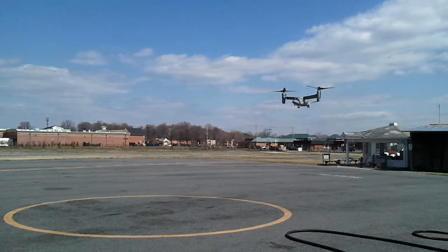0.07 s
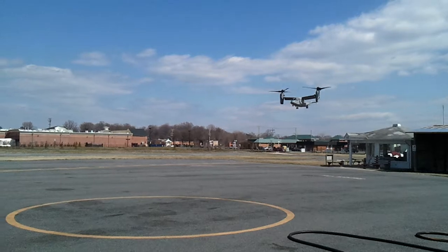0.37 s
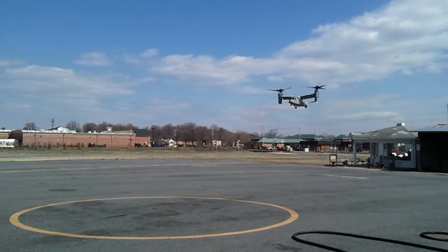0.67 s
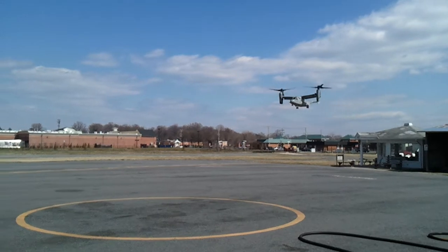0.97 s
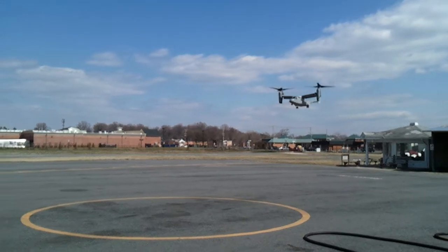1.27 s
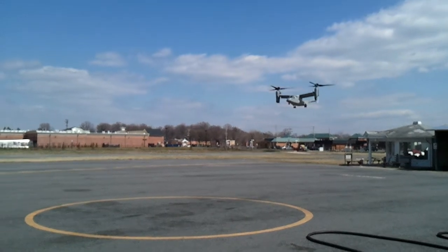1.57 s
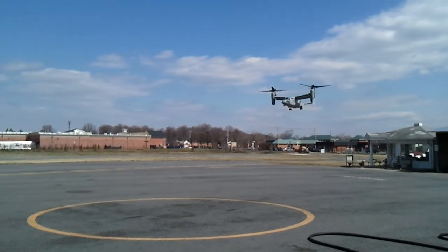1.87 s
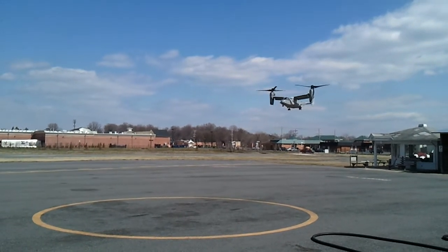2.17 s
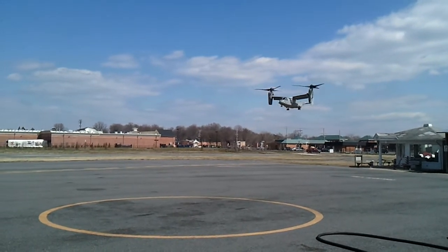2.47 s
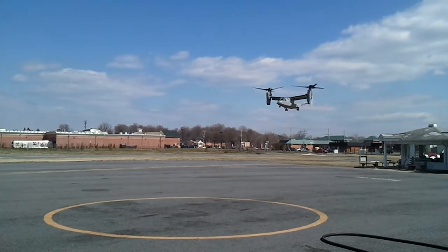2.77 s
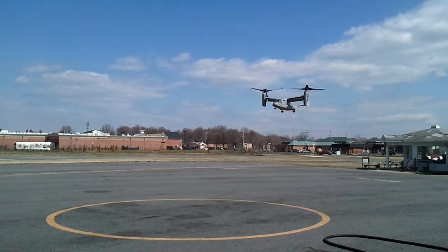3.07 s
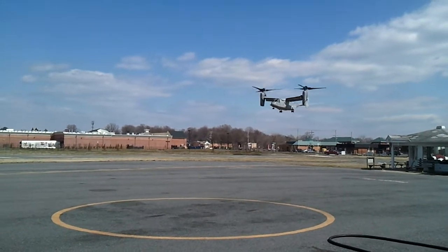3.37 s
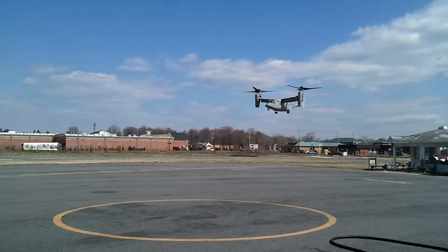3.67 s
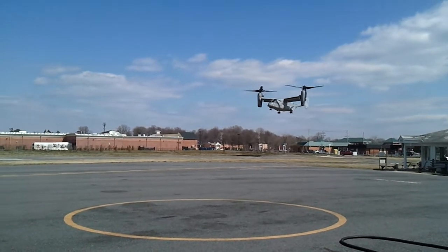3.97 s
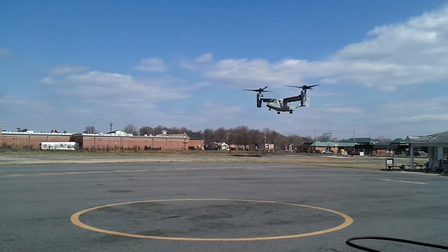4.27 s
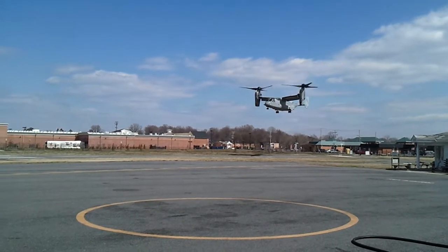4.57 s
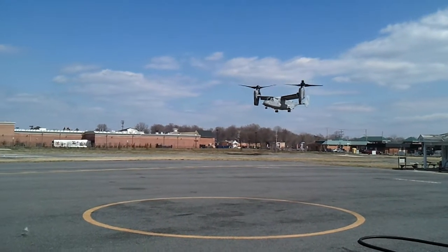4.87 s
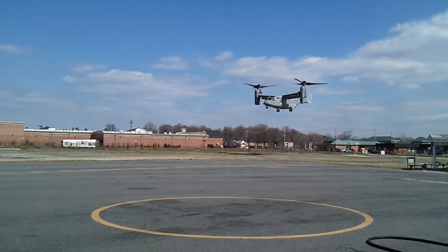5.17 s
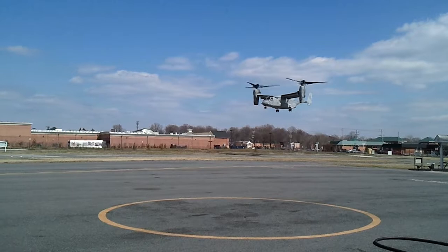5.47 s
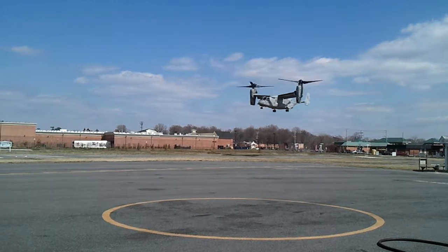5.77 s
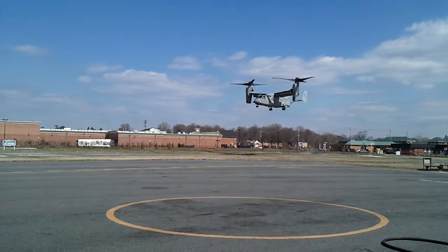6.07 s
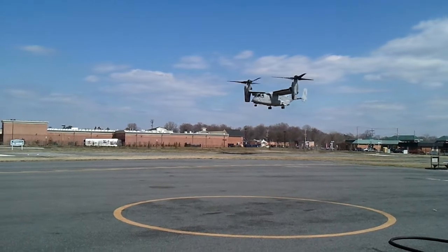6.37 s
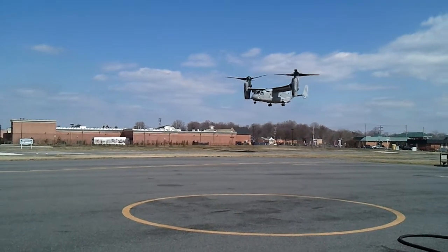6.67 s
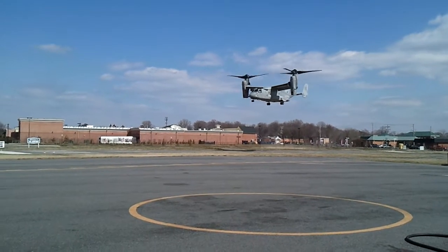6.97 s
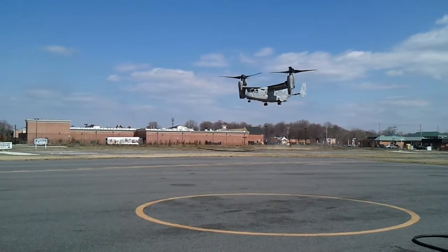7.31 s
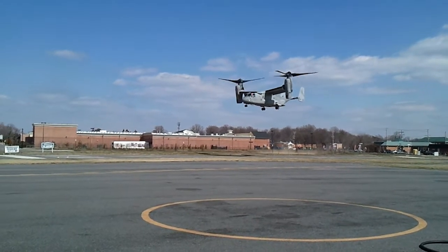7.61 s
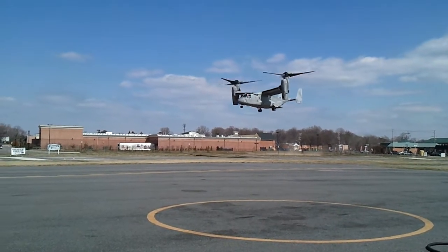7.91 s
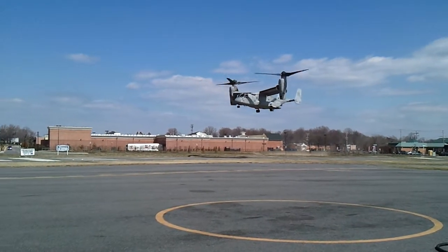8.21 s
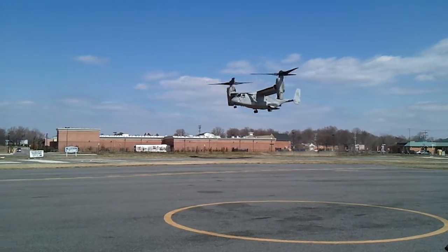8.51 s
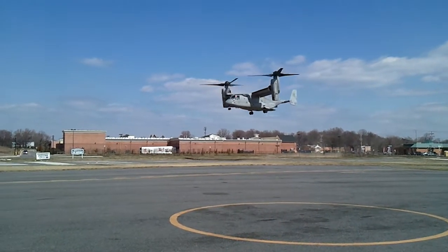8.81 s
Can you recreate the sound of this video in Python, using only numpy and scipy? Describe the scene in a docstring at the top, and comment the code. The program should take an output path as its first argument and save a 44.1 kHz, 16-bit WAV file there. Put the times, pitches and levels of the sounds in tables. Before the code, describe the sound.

Loud, rapid, rasping rotor thumps from a nearing tiltrotor overload the microphone, joined by a swelling engine roar and whine.

```python
"""Fast, rasping thumps fade up after a short silence: a tiltrotor comes in low over an airfield.
Its two three-bladed rotors turn in step. The blades thump, slap through vortices (whirls of air
shed by the blade tips) and churn their wake. As the aircraft turns side-on, the rotors' thumps
slide past each other and the turbines' roar and whine grow. The pressure completely overloads
the small microphone, so the thumps choke the roar into rasping bursts."""
import sys
import numpy as np
from scipy import signal
from scipy.fft import rfft, irfft, next_fast_len
from scipy.io import wavfile
from scipy.ndimage import uniform_filter1d, minimum_filter1d

SR = 44100
rng = np.random.default_rng(int(sys.argv[2]) if len(sys.argv) > 2 else 0)


def materialize(psi):
    """Save the field psi as 16-bit PCM at rate SR to the path in sys.argv[1].

    A 1-D psi becomes a single channel; in a 2-D psi each row is a channel.
    """
    bounded = np.clip(np.atleast_2d(psi).T, -1, 1)
    quanta = np.round(bounded * 32767).astype(np.int16)
    wavfile.write(sys.argv[1], SR, quanta)


N = 390285
TIME = np.arange(N) / SR


def from_db(db):
    """Turn decibels into a number to multiply by."""
    return 10 ** (np.asarray(db) / 20)


def unit_power(x):
    """Scale a signal so that its average power is 1."""
    return x / np.sqrt(np.mean(x ** 2) + 1e-20)


def in_time(rows):
    """Join a table's rows with straight lines: one curve for each column after the time."""
    seconds, *columns = np.transpose(rows)
    return [np.interp(TIME, seconds, column) for column in columns]


def bell(offset, width):
    """A smooth hump, 1 high where the offset is zero."""
    return np.exp(-(offset / width) ** 2)


def drift(rate_hz):
    """A smooth random wobble, typically about 1 in size."""
    step, warm_up = 40, 2000
    pole = np.exp(-2 * np.pi * rate_hz * step / SR)
    noise = rng.standard_normal(N // step + warm_up + 2)
    slow = signal.lfilter([1], [1, -2 * pole, pole * pole], noise)[warm_up:]
    return np.interp(np.arange(N) / step, np.arange(len(slow)), unit_power(slow))


def coloured(noise, spectrum):
    """Shape noise with a spectrum, which says how strong its pitches are next to each other."""
    size = next_fast_len(N)
    hz, db = np.transpose(spectrum)
    bin_hz = np.maximum(np.fft.rfftfreq(size, 1 / SR), 1)
    gain = from_db(np.interp(np.log(bin_hz), np.log(hz), db))
    return unit_power(irfft(rfft(noise, size) * gain, size)[:N])


def shaped_noise(spectrum):
    """Fresh, steady noise with the given spectrum."""
    return coloured(rng.standard_normal(N), spectrum)


def since(cycles):
    """Time from the nearest blade pass, negative before it. One cycle runs from blade to blade."""
    return (cycles + .5) % 1 - .5


def eddies(cycles, spectrum, memory, points=2048):
    """Each blade meets nearly the same swirls of air as the last, so this noise partly repeats."""
    fresh = rng.standard_normal((int(cycles[-1]) + 2, points))
    swirls = signal.lfilter([1], [1, -memory], fresh, axis=0).ravel()
    return coloured(np.interp(cycles * points, np.arange(swirls.size), swirls), spectrum)


# The turn. Each row: time in seconds, angle from the aircraft's nose to the microphone in degrees.
HEADING = [(.8, 16.4), (3.3, 21), (4.4, 30.8), (5.3, 32.6), (6.1, 43.3), (7, 55.8), (7.7, 63.1),
           (8.85, 64.3)]
def flight(blade_hz=21.421, sag_hz_per_s=.0413):
    """Give the heading and count blade passes; the Doppler shift ebbs as the craft slows and turns."""
    heading, = in_time(HEADING)
    return heading, np.cumsum(blade_hz - sag_hz_per_s * TIME) / SR


def thump(cycles, width):
    """A blade pushes on the air: suction, then pressure."""
    phase = since(cycles) / width
    return phase * np.exp((1 - phase ** 2) / 2)


def slaps(cycles, lead=.0281, spacing=.175, width=.0202):
    """A blade cuts two vortices in turn; each gives a suction spike between two humps of pressure."""
    out = 0
    for delay, db in ((0, .5), (spacing, -4.5)):
        phase = since(cycles + lead - delay) / width
        out += from_db(db) * (phase ** 2 - 1) * np.exp(-phase ** 2 / 2)
    return out


# How the thumps change in the turn. Each row: time in seconds, near rotor gain in dB,
# far rotor gain in dB, delay of the far thump in cycles, hum level in dB.
THUMP_CHANGES = [(.8, 0, 0, .41, -20), (2.2, 0, 0, .41, -19), (3.2, 0, 0, .405, -16.5),
                 (3.8, 0, .5, .412, -16.5), (5.1, 0, .5, .416, -16), (5.8, -1, 2, .39, -18.5),
                 (6.4, -1, .5, .394, -18.5), (7, 0, -1, .41, -16.5), (7.6, -.5, -1, .41, -14.5),
                 (8.85, -1, -.5, .41, -16)]
def rotors(cycles, heading, meet_deg=44, slide_cycles_per_deg=.01, hum_harmonic=5):
    """Both rotors thump over a steady hum. Gives the sound and each rotor's count of blade passes."""
    near_db, far_db, far_delay, hum_db = in_time(THUMP_CHANGES)
    far = cycles - far_delay
    # turning shifts the paths from the two rotors, so their thumps meet and part again
    near = far + slide_cycles_per_deg * (meet_deg - heading)
    near_rotor = from_db(near_db) * thump(near + .001 * drift(9), width=.0586)
    far_rotor = from_db(far_db) * (from_db(-4.5) * thump(far, width=.0504) + slaps(far))
    hum = from_db(hum_db) * np.sin(2 * np.pi * hum_harmonic * far)
    return (near_rotor + far_rotor + hum) * from_db(1.3 * drift(2.16)), near, far


# The noise of a cut vortex. Each row: pitch in Hz, level in dB.
VORTEX_SPECTRUM = [(250, 0), (480, -2), (615, 9.5), (780, 3.5), (950, -4), (1250, 1), (1500, -4),
                   (2000, -27), (3500, -48.5), (7000, -49)]
# The hardest slaps. Each row: start in seconds, relative level in dB, pitch in Hz.
BARK_HITS = [(1.005, -5, 660), (1.976, 0.5, 697), (2.269, -5, 587), (2.316, -2.5, 705), (2.374, -2, 633),
             (2.878, 1, 645), (3.164, -5, 1212), (3.368, -3.5, 611), (3.825, -10, 624), (4.005, 0.5, 630),
             (4.098, -5.5, 785), (4.43, -1, 808), (4.572, -2, 620), (4.622, -4, 635), (4.655, -1.5, 610),
             (4.813, 3, 626), (5.761, 4, 634), (5.895, -1, 630), (5.989, 0.5, 1260), (6.13, -1, 650),
             (6.325, 0, 641), (8.124, 3, 607), (8.514, 1, 606)]
def barks(gain_db=-1.5, rise_s=.0024, ring_share=.64, swell_db=6, swell_lead_s=.0042):
    """A blade cuts a vortex squarely: a swell of pressure, then a bark, part ring and part noise."""
    out, noise = np.zeros(N), shaped_noise(VORTEX_SPECTRUM)
    for start, db, hz in BARK_HITS:
        span = slice(int((start - 4 * swell_lead_s) * SR), int((start + 10 * rise_s) * SR))
        age = np.maximum(TIME[span] - start, 0)
        ring = np.sqrt(2) * np.sin(2 * np.pi * hz * age)
        burst = from_db(db + gain_db) * age / rise_s * np.exp(1 - age / rise_s)
        out[span] += from_db(swell_db) * bell(TIME[span] - start + swell_lead_s, width=.0027)
        out[span] += burst * (ring_share * ring + (1 - ring_share) * noise[span])
    return out


def drone(cycles, pitch_hz, blade_hz=21.421, delay_cycles=.1308, decay_cycles=.36):
    """The same dying swell of pressure waves follows every blade."""
    age = (cycles - delay_cycles) % 1
    swell = np.exp(-age / decay_cycles) * np.sqrt(np.sin(np.pi * age))
    return -unit_power(swell * np.sin(2 * np.pi * pitch_hz * age / blade_hz))


# The wake's churning and its low rumble. Each row: pitch in Hz, level in dB.
CHURN_SPECTRUM = [(40, -8), (100, -2), (180, .5), (235, 1.5), (285, 4.5), (340, 5.5), (415, 3.5),
                  (500, -12.5), (620, -5.5), (800, -14.5), (1300, -29), (2500, -55.5), (6000, -96.5)]
RUMBLE_SPECTRUM = [(60, -28), (125, -10), (165, 0.5), (215, -5), (300, -11.5), (700, -58.5)]
# How the blades meet their wake. Each row: time in seconds, depth of the lull between thumps from
# 0 to 1, rumble, churn and drone levels in dB, drone pitch in Hz, crackle and crack levels in dB.
WAKE_CHANGES = [(.8, .05, -4.5, -11, -29, 175, -16.5, -27), (2.2, 0, -7, -10.5, -28.5, 175, -14, -27),
                (3.1, .42, -13, -9, -23, 330, -20, -19), (3.8, .58, -19, -9.5, -22, 340, -14.5, -15.5),
                (4.6, .78, -19, -8.5, -23.5, 335, -9.5, -7.5), (5.05, .68, -18, -9.5, -25, 250, -10.5, -10),
                (5.3, .45, -16, -10, -23, 240, -16.5, -15), (5.9, .15, -10, -10, -14.5, 245, -10.5, -10),
                (6.9, .35, -12, -9, -22, 300, -16.5, -21), (7.7, .4, -12.5, -13.5, -30, 220, -14, -12.5),
                (8.5, .55, -7.5, -12.5, -22, 225, -12, -3)]
def wake(cycles, far, onset_cycles=.13):
    """Blades stir the air behind them. Gives the sound, its lulls and the level for the cracks."""
    depth, rumble_db, churn_db, drone_db, drone_hz, crackle_db, crack_db = in_time(WAKE_CHANGES)
    churn = from_db(churn_db) * eddies(cycles, CHURN_SPECTRUM, memory=.78)
    tone = from_db(drone_db + 1.5 * drift(6.9)) * drone(far, drone_hz)
    rumble = from_db(rumble_db) * eddies(cycles, RUMBLE_SPECTRUM, memory=.858)
    crackle = from_db(crackle_db + 1.66 * drift(40)) * eddies(cycles, VORTEX_SPECTRUM, memory=.53)
    # the churning breaks out as the blade cuts the vortices and dies down towards the next thump
    age = (far - onset_cycles) % 1
    lull = depth * np.sin(np.pi / 2 * age) ** 2
    return (churn + tone + rumble + crackle) * (1 - lull), lull, crack_db


# The bright sound of a crack. Each row: pitch in Hz, level in dB.
CRACK_SPECTRUM = [(300, -7), (650, -1), (1400, 5.5), (2400, -8.5), (3800, -21), (7000, -22.5)]
# Two cracks for each blade. Each row: delay after the thump in cycles, relative level in dB.
CRACK_HITS = [(.07, -2.5), (0.238, -4)]
def cracks(cycles, decay_cycles=.028, scatter_db=5):
    """A blade meets the vortices with two sharp cracks, each with a strength of its own."""
    bursts = sum(from_db(db) * np.exp(-((cycles - delay) % 1) / decay_cycles)
                 for delay, db in CRACK_HITS)
    return bursts * from_db(scatter_db * drift(13)) * shaped_noise(CRACK_SPECTRUM)


# The hollow whop and the hard clatter. Each row: pitch in Hz, level in dB.
WHOP_SPECTRUM = [(130, -10), (235, 3), (320, -14), (450, 3), (560, -9), (900, -35)]
CLATTER_SPECTRUM = [(500, -21.5), (1000, -5), (1450, 1.5), (2500, -1), (3300, -2), (5000, -18)]
# Both grow late in the turn. Each row: time in seconds, level in dB.
CLATTER_GROWTH = [(7.2, -40), (7.7, -20), (8.1, -3), (8.85, -5)]
def clatter(cycles, delay_cycles=.492, whop_lead_cycles=.08, whop_db=3):
    """Side-on, the near rotor whops just before each thump and clatters between thumps."""
    level_db, = in_time(CLATTER_GROWTH)
    swell = bell(since(cycles + whop_lead_cycles), width=.17)
    whop = from_db(whop_db) * swell * eddies(cycles, WHOP_SPECTRUM, memory=.6)
    burst = bell(since(cycles - delay_cycles), width=.07)
    return from_db(level_db + 2 * drift(10)) * (burst * shaped_noise(CLATTER_SPECTRUM) + whop)


# Exhaust roar, intake hiss and compressor rasp. Each row: pitch in Hz, level in dB.
ROAR_SPECTRUM = [(100, 8.5), (400, 17), (800, 13.5), (950, 11.5), (1130, 15), (1360, 15.5), (1550, 13),
                 (2000, 12.5), (2450, 14.5), (2900, 3.5), (3800, -5), (5000, -18), (6500, -6.5), (10000, 1)]
HISS_SPECTRUM = [(2000, -36), (3100, -6), (3800, -1), (4300, -4), (4800, -13), (5500, -14.5), (9000, -24.5)]
RASP_SPECTRUM = [(1000, -14), (1700, -4.5), (2200, -4.5), (2470, 1.5), (2750, -17), (4000, -40)]
# The compressors' whine. Each row: pitch in Hz, level in dB compared with the roar.
WHINE_TONES = [(1122, -13.7), (2330, -23), (2466, -16.5)]
def turbines(heading, exhaust_deg=35.3, rasp_deg=46.3, hiss_deg=58.6, nearing_db_per_s=.8152):
    """The engines roar and whine; their rasp, then their hiss, sweep past like beams in the turn."""
    hiss_db = -12 + 9 * bell(heading - hiss_deg, width=8.3)
    rasp_gain = from_db(-5.5) * bell(heading - rasp_deg, width=7.5)
    out = shaped_noise(ROAR_SPECTRUM)
    out += from_db(hiss_db) * shaped_noise(HISS_SPECTRUM)
    out += rasp_gain * shaped_noise(RASP_SPECTRUM)
    for hz, db in WHINE_TONES:
        turns = np.cumsum(hz * (1 + .005 * drift(8.46))) / SR  # wavers in the moving air
        out += np.sqrt(2) * from_db(db + 3 * drift(3.3)) * np.sin(2 * np.pi * turns)
    # it all swells as the exhausts come into view and the aircraft nears
    in_view = 1 / (1 + np.exp((exhaust_deg - heading) / 1.9))
    level_db = -36.5 + 19.5 * in_view + nearing_db_per_s * TIME
    flicker_db = 4 * drift(88)
    return out * from_db(level_db + flicker_db)


def scene():
    """Add up the sound at the microphone; a near rotor thump is about 1 high."""
    heading, cycles = flight()
    thumps, near, far = rotors(cycles, heading)
    churning, lull, crack_db = wake(cycles, far)
    engines = turbines(heading) * (1 - .5 * lull)  # dips half as far as the wake does
    cracking = from_db(crack_db) * cracks(far)
    return (thumps + barks() + churning + cracking + clatter(near) + engines)[None]


def cut(x, order, hz, keep):
    """Keep the "low" or "high" side of a pitch; a higher order cuts more steeply."""
    return signal.sosfilt(signal.butter(order, hz, keep, fs=SR, output="sos"), x)


def bass_cut(x, corner_hz, q):
    """The microphone loses bass, so each flat top of the wave sags back to zero."""
    w = 2 * np.pi * corner_hz
    return signal.lfilter(*signal.bilinear([1, 0, 0], [1, w / q, w * w], SR), x)


def limiter(x, threshold_db):
    """Quickly turn down each peak; the shrillest spikes are too brief to be caught."""
    detected = np.abs(uniform_filter1d(x, size=5)) + 1e-9
    gain = np.minimum(1, from_db(threshold_db) / detected)
    held = minimum_filter1d(gain, size=23)
    return x * uniform_filter1d(uniform_filter1d(held, size=17), size=15)


def record(dry, drive_db=23.5, start_s=.786, start_gain=.18, fade_s=.23, ceiling=.72):
    """The overloaded microphone flattens the wave; bass and treble are cut and the peaks tamed."""
    # a little treble and hiss get through even while the wave is pinned flat
    treble_leak = from_db(-10) * cut(dry, 1, 1800, "high")
    hiss = from_db(-32) * rng.standard_normal(dry.shape)
    overloaded = np.tanh(from_db(drive_db) * dry) + treble_leak + hiss
    thinned = from_db(-5.4) * bass_cut(overloaded, corner_hz=170, q=.6)
    rounded = from_db(1) * np.tanh(thinned / from_db(1))
    fade_in = (TIME >= start_s) * np.minimum(1, start_gain + (1 - start_gain) * (TIME - start_s) / fade_s)
    softened = cut(fade_in * rounded, 1, 4200, "low")
    dulled = cut(softened, 10, 6800, "low")
    limited = limiter(dulled, threshold_db=-3.39 + .17 * drift(60))
    clipped = np.clip(limited, -ceiling, ceiling)
    centred = cut(clipped, 2, 25, "high")
    top_cut = signal.ellip(10, .1, 70, 16000, fs=SR, output="sos")  # steep drop above 16000 Hz
    return signal.sosfilt(top_cut, centred)


dry = scene()
out = record(dry)
materialize(out)
```